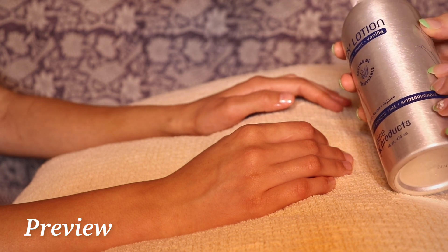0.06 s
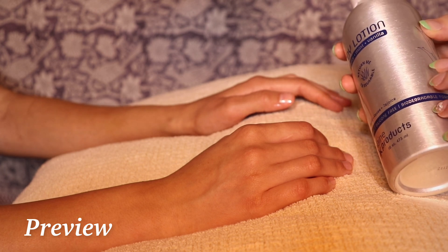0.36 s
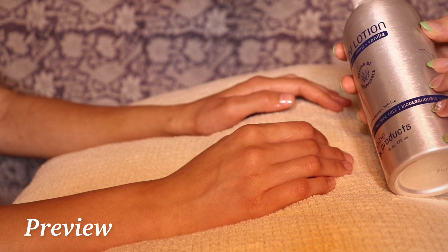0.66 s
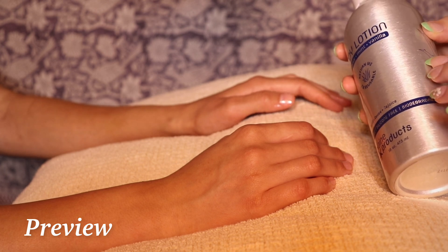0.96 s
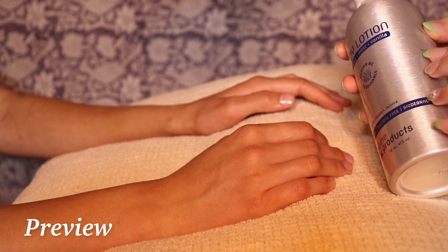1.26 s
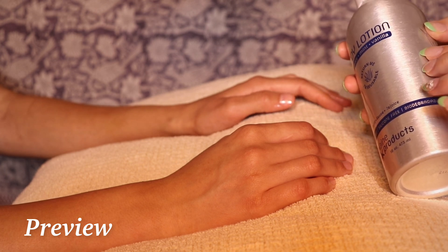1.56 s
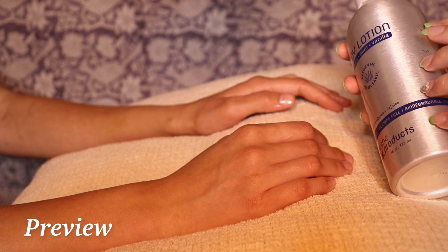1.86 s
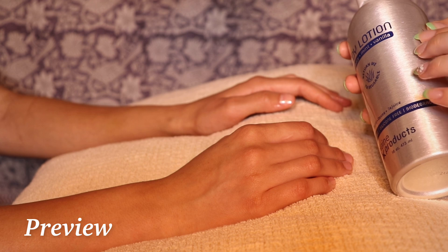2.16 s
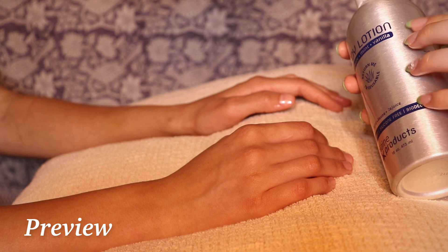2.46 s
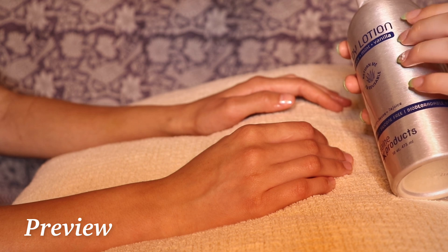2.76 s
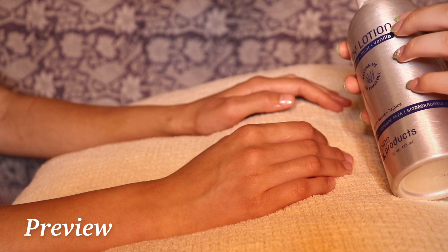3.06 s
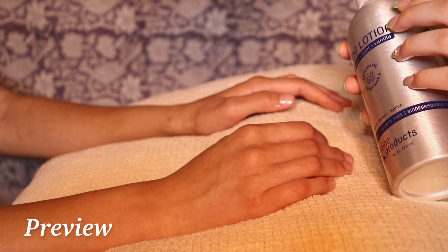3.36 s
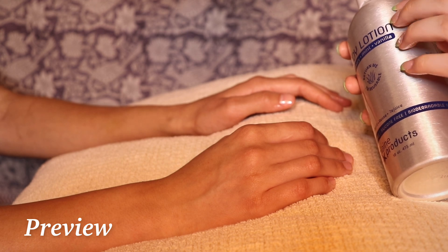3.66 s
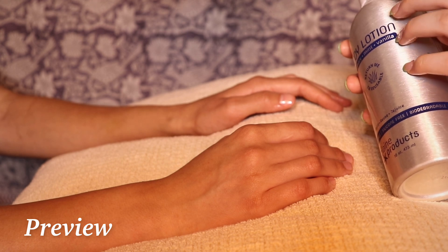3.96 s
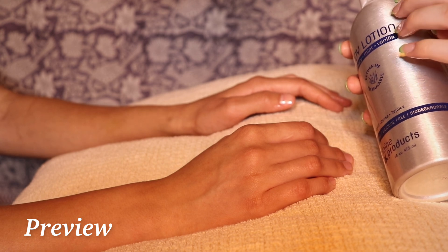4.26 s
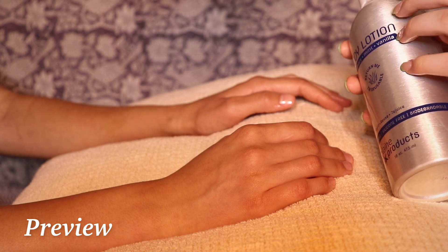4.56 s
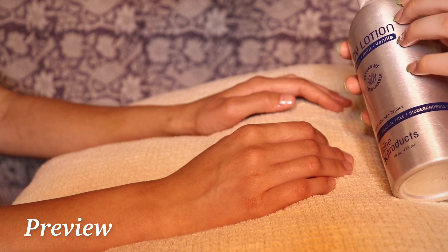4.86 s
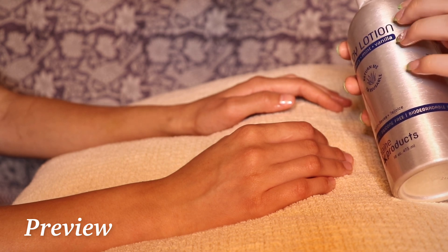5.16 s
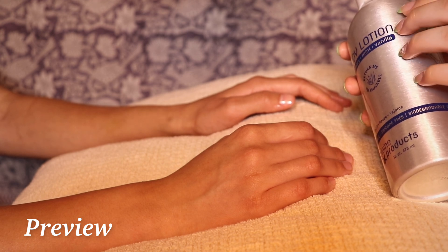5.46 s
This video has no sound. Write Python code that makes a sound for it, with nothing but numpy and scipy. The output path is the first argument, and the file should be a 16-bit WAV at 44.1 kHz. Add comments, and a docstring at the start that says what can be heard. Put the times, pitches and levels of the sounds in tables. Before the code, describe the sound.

In a small, quiet room, fingernails click on a metal bottle in a quick, irregular pattern, about six or seven taps a second. The taps are close and crisp, their ring cut short by the holding hand, and they move slightly between left and right. A soft towel rustle and a few dull presses on a padded table lie far below them, along with faint room hum and microphone hiss.

```python
"""Sharp clicks come first: long fingernails tap a hand-held metal lotion bottle near a stereo microphone. Each
nail makes the metal wall ring briefly, the hand damps it, and a small, soft room answers. Underneath, hands
shift on a towel, which rustles while the padded table gives a muffled rumble. A faint hum, partly the table's
low resonance, and a microphone hiss run all the way through."""
import sys
import numpy as np
from scipy import signal
from scipy.fft import rfft, irfft, next_fast_len
from scipy.io import wavfile
from scipy.ndimage import uniform_filter1d, map_coordinates

SR = 44100
rng = np.random.default_rng(int(sys.argv[2]) if len(sys.argv) > 2 else 0)


def inscribe(sig):
    """Save sig as 16-bit PCM at rate SR to the path in sys.argv[1].

    A 1-D sig is mono; a 2-D sig holds one channel per row.
    Samples are clipped to [-1, 1] before scaling.
    """
    pcm = np.round(np.clip(np.atleast_2d(sig).T, -1, 1) * 32767)
    wavfile.write(sys.argv[1], SR, pcm.astype(np.int16))


N = 242991

# the steady faint tones: (frequency [Hz], level [dB]); the lowest, near 103 Hz, is the padded table's
# resonance, the rest the room's hum
HUM_TONES = [(102.5, -82), (360.7, -84), (473, -97.5), (527, -99), (829, -101)]
# the tone colour of each noise: (frequency [Hz], relative level [dB])
HISS_COLOUR = [(100, -2), (1500, -1), (2800, -1.5), (6500, 1), (10000, 0), (15600, -.5), (16300, -25)]  # microphone
RUMBLE_COLOUR = [(12, -40), (24, -19.5), (32, -5.5), (40, 4.5), (50, -9.5), (62, -15), (100, -34),
                 (400, -100)]  # the table's deepest sound
THUD_COLOUR = [(40, -28), (60, 1.5), (80, -4), (92, -7), (103, 1.5), (128, -9.5), (190, -18), (300, -44.5),
               (700, -87.5)]  # the table, a little higher
CLOTH_COLOUR = [(60, -14.5), (170, 5.5), (330, 1.5), (430, -6.5), (700, -14), (1100, -23), (2000, -29),
                (6000, -36.5)]  # towel
WEAK_TONES_COLOUR = [(300, -28.5), (1000, -20.5), (1900, -19.5), (3000, -10), (6000, -4), (9000, 1),
                     (11000, 6.5), (16000, -8)]  # the bottle's many weak, crowded tones
ROOM_COLOUR = [(500, -3), (3000, 0.5), (7000, -2.5), (10000, -2), (13000, -4.5), (15600, -5), (16400, -19)]  # the room's answer
# how much the hands move on the towel: (time [s], relative level [dB])
HAND_MOTION = [(0, -0.5), (1.3, 0.5), (1.45, -3.5), (3.6, -3), (4.2, 2), (5.2, 0), (5.51, -2)]
# a hand presses into the padded table: (time [s], half length [s], rumble [dB], thud [dB])
HAND_PRESSES = [(0.624, 0.073, -54.5, -59), (0.819, .055, -46.5, -49.5), (0.917, .04, -71.5, -50),
                (1.865, 0.055, -56, -63), (4.59, 0.21, -53.5, -73)]
# soft brushes of cloth: (time [s], level [dB], strongest frequency [Hz], half length [s])
CLOTH_BRUSHES = [(2.929, -64.5, 480, 0.01), (3.046, -71, 600, 0.0045)]
# how long the room rings: (frequency [Hz], time to fade by 60 dB [s])
ROOM_FADE = [(500, 0.28), (2500, 0.18), (5000, 0.23), (9000, 0.21), (15000, 0.23)]
# first echoes from nearby surfaces: (delay [s], level against the click [dB])
NEAR_ECHOES = [(.0059, -30), (0.0134, -29)]
# the shell's hollow knock drifts with the grip: (time [s], upper tone [Hz], lower tone against it [dB])
KNOCK_TONES = [(0.498, 2500, -27), (1.196, 2320, -16), (1.701, 2333, -5.5), (2, 2264, -22),
               (2.948, 2223, -30), (5.102, 2270, -19)]
# the main tones of the bottle wall: (frequency [Hz], relative level [dB], base time to fade by 60 dB [s])
WALL_TONES = [(3050.0, -12, 0.02), (3750.0, -7, 0.009), (4280.0, -6, 0.013), (4830.0, -7, 0.005),
              (5810.0, 0, 0.005), (6280.0, -1, 0.008), (6870.0, 5, 0.005), (7640.0, 4, 0.006),
              (8240.0, 3, 0.005), (9260.0, -3, 0.009), (9820.0, -6, 0.006), (12030.0, -1, 0.007),
              (12770.0, 1, 0.005), (14010.0, -7, 0.005), (15100.0, -4, 0.005)]
# the dull tick of the finger behind the nail: (frequency [Hz], relative level [dB])
FINGER_COLOUR = [(150, -11), (700, -3.5), (1500, 10.0), (2500, -6.5), (8000, -9)]
# nails that only graze the bottle: (time [s], relative level [dB])
NAIL_GRAZES = [(.339, -44), (0.973, -54), (2.105, -61)]
# nail taps: (time [s], level [dB], wall pitch [ratio], spot along the wall [0-1], spot around it [0-1],
# low edge of the click [Hz], brightness [dB], knock against the click [dB], left minus right [dB])
NAIL_TAPS = [(0.122, -28.1, 1.02, 0.13, 0.45, 4400.0, 4.0, -47.0, -5.0),
             (0.2838, -24.3, 1.01, 0.34, 0.2, 3200.0, -0.0, -41.0, -2.0),
             (0.292, -26.9, 0.99, 0.1, 0.05, 2900.0, 7.0, -41.0, -4.0),
             (0.3431, -38.9, 1.07, 0.08, 0.4, 2900.0, 8.0, -43.0, -3.0),
             (0.5123, -22.8, 0.93, 0.09, 0.05, 2600.0, 15.0, -28.0, 0.0),
             (0.7467, -32.1, 0.98, 0.16, 0.1, 3900.0, -9.0, -44.0, -4.0),
             (0.8511, -23.2, 1.02, 0.05, 0.0, 2900.0, -1.0, -50.0, 0.0),
             (0.9913, -36.8, 1.01, 0.12, 0.5, 2900.0, -15.0, -17.0, -5.0),
             (1.2237, -31.5, 0.93, 0.17, 0.0, 3500.0, -1.0, -44.0, -5.0),
             (1.431, -22.6, 0.99, 0.18, 0.35, 4400.0, -4.0, -52.0, 0.0),
             (1.5916, -30.7, 1.02, 0.34, 0.2, 2900.0, 12.0, -51.0, 2.0),
             (1.6769, -27.0, 0.93, 0.16, 0.35, 3900.0, -6.0, -29.0, 1.0),
             (1.9327, -37.0, 0.97, 0.16, 0.1, 3200.0, -16.0, -39.0, -3.0),
             (1.9768, -22.9, 1.05, 0.09, 0.35, 3200.0, 12.0, -32.0, 2.0),
             (2.1923, -31.0, 0.96, 0.11, 0.2, 2900.0, -1.0, -46.0, 3.0),
             (2.4703, -35.1, 0.96, 0.21, 0.45, 3200.0, 2.0, -47.0, 1.0),
             (2.5826, -36.2, 0.98, 0.43, 0.15, 3200.0, 20.0, -43.0, 3.0),
             (2.6711, -23.0, 0.99, 0.26, 0.2, 2900.0, 6.0, -52.0, 2.0),
             (2.889, -34.9, 0.97, 0.18, 0.45, 3200.0, -3.0, -31.0, 1.0),
             (2.9572, -23.0, 0.98, 0.19, 0.35, 4400.0, 9.0, -31.0, 3.0),
             (3.1792, -29.7, 1.0, 0.02, 0.3, 3200.0, 3.0, -53.0, 4.0),
             (3.4062, -23.5, 0.99, 0.1, 0.0, 2600.0, 7.0, -37.0, 2.0),
             (3.4355, -23.5, 0.99, 0.09, 0.0, 2600.0, 20.0, -31.0, 3.0),
             (3.7478, -34.6, 0.95, 0.4, 0.3, 4400.0, 0.0, -54.0, 5.0),
             (4.005, -33.4, 1.06, 0.27, 0.05, 3200.0, -12.0, -52.0, -1.0),
             (4.1285, -24.9, 0.97, 0.1, 0.3, 2900.0, 1.0, -48.0, -1.0),
             (4.1729, -26.7, 0.99, 0.1, 0.05, 2900.0, 18.0, -48.0, 1.0),
             (4.3006, -30.4, 1.0, 0.12, 0.4, 4400.0, 0.0, -55.0, 0.0),
             (4.4218, -35.2, 1.04, 0.2, 0.4, 2600.0, -3.0, -41.0, -4.0),
             (4.4888, -24.4, 0.97, 0.1, 0.3, 2900.0, 9.0, -52.0, -1.0),
             (4.5437, -23.4, 1.0, 0.45, 0.5, 5000.0, 10.0, -42.0, 0.0),
             (4.7181, -30.6, 1.01, 0.34, 0.4, 4400.0, -4.0, -52.0, 1.0),
             (4.9386, -30.8, 1.07, 0.3, 0.35, 2900.0, -19.0, -41.0, -4.0),
             (5.0766, -40.9, 0.98, 0.42, 0.5, 3200.0, -14.0, -28.0, -8.0),
             (5.1034, -23.3, 0.95, 0.18, 0.3, 5000.0, 5.0, -37.0, 0.0),
             (5.2888, -23.1, 0.97, 0.39, 0.25, 2900.0, 11.0, -55.0, 3.0),
             (5.5059, -24.6, 0.97, 0.11, 0.3, 2900.0, 4.0, -43.0, 2.0)]

HISS_DB, TOP_HZ = -75.6, 16700
RUMBLE_DB, THUD_DB, CLOTH_DB = -59.5, -64.5, -70.5  # when the hand motion is at 0 dB
FIRM_TAP_DB = -23  # lighter taps are counted down from this level


def amp(db):
    """Turn decibels into a number to multiply a sound by."""
    return 10 ** (np.asarray(db) / 20)


def unit(x):
    """Scale a sound so that its average level (rms) is 1."""
    return x / np.sqrt(np.mean(x ** 2) + 1e-20)


def along(points, hz):
    """Read between (frequency, value) points on a logarithmic frequency scale."""
    frequencies, values = np.transpose(points)
    return np.interp(np.log(hz + 1), np.log(frequencies + 1), values)


def filtered(x, gain):
    """Turn each frequency of a sound up or down by gain(frequency)."""
    size = x.shape[-1]
    padded = next_fast_len(size + SR // 10)
    return irfft(rfft(x, padded) * gain(np.fft.rfftfreq(padded, 1 / SR)), padded)[..., :size]


def causal(gain):
    """Make a filter with this gain that lets nothing sound before the blow (minimum phase)."""
    cepstrum = irfft(np.log(np.maximum(gain, 1e-6)))
    half = cepstrum.shape[-1] // 2
    cepstrum[..., 1:half] *= 2
    cepstrum[..., half + 1:] = 0
    return np.exp(rfft(cepstrum))


def sides(pan_db):
    """Left and right gains that make the left side pan_db louder than the right."""
    pair = amp(np.array([[.5], [-.5]]) * pan_db)
    return pair / np.sqrt(np.mean(pair ** 2, axis=0))


def noise(colour, side_db, size=N):
    """Stereo noise of level 1 with this tone colour; a higher side_db makes it wider."""
    mid, side = filtered(rng.standard_normal((2, size)), lambda hz: amp(along(colour, hz)))
    return unit(np.array([mid + amp(side_db) * side, mid - amp(side_db) * side]))


def wobble(per_second):
    """A smooth curve through this many random values a second."""
    return map_coordinates(rng.standard_normal(256), [np.arange(N) * per_second / SR], mode="wrap")


def add(track, time, sound):
    """Mix a sound into the track, starting at a time in seconds."""
    part = track[:, max(round(time * SR), 0):][:, :sound.shape[1]]
    part += sound[:, :part.shape[1]]


def hum_and_hiss():
    """A few faint, wavering tones hum (the lowest from the padded table, the rest from the room), and the
    microphone hisses."""
    t = np.arange(N) / SR
    drift_times = np.linspace(0, N / SR, num=20)
    hum = np.zeros(N)
    for hz, db in HUM_TONES:
        drift = np.interp(t, drift_times, 1.9 * rng.standard_normal(len(drift_times)))
        hum += amp(db) * np.sqrt(2) * np.sin(2 * np.pi * hz * t + drift)
    return hum + amp(HISS_DB) * noise(HISS_COLOUR, side_db=-2)


def hands_on_towel():
    """Hands press and slide unevenly: the padded table rumbles and thuds under a soft, wide rustle."""
    t = np.arange(N) / SR
    motion_db = np.interp(t, *np.transpose(HAND_MOTION)) + 1.46 * wobble(per_second=9)
    rumble = amp(RUMBLE_DB + 1.4 * motion_db)
    thud = amp(THUD_DB + motion_db)
    for time, half_length, rumble_db, thud_db in HAND_PRESSES:
        swell = np.exp(-((t - time) / half_length) ** 2)
        rumble = np.hypot(rumble, amp(rumble_db) * swell)
        thud = np.hypot(thud, amp(thud_db) * swell)
    table = rumble * noise(RUMBLE_COLOUR, side_db=-18) + thud * noise(THUD_COLOUR, side_db=-17)
    cloth = amp(CLOTH_DB + motion_db) * noise(CLOTH_COLOUR, side_db=-2)
    for time, db, hz, half_length in CLOTH_BRUSHES:
        swell = np.exp(-((t - time) / half_length) ** 2)
        colour = [(hz / 3, -25), (hz, 0), (hz * 2, -16), (hz * 10, -50)]
        cloth += amp(db) * swell * noise(colour, side_db=7)
    return table * sides(2.5) + cloth


def room_tail():
    """The room's many echoes blur into a fading noise, new on every call."""
    hz, t, spectrum = signal.stft(rng.standard_normal((2, SR // 3)), SR, nperseg=128)
    fade = amp(along(ROOM_COLOUR, hz)[:, None] - 60 * t / along(ROOM_FADE, hz)[:, None])
    tail = signal.istft(spectrum * fade, SR, nperseg=128)[1]
    tail *= np.clip(np.arange(tail.shape[1]) / SR / .003, 0, 1)  # builds up over 3 ms
    return tail / np.linalg.norm(tail[0])


def shell_knock(time, size=2048):
    """The bottle's whole shell rings with two low tones: a hollow knock."""
    t = np.arange(size) / SR
    times, upper_hz, lower_db = np.transpose(KNOCK_TONES)
    phase = 2 * np.pi * np.interp(time, times, upper_hz) * t
    lower_tone = amp(np.interp(time, times, lower_db)) * np.sin(.73 * phase)
    ring = (np.sin(phase) + lower_tone) * amp(-60 * t / .029)
    rise = 1 - np.exp(-t / .0007)
    return sides(-4) * unit(ring * rise) / np.sqrt(size)


def wall_ring(t, pitch, along_wall, around_wall, ring_db):
    """The spot under the nail decides which tones sound; a looser grip (higher ring_db) lengthens them."""
    hz, db, base_fade = np.transpose(WALL_TONES)[:, :, None]
    lengthwise = np.arange(1, len(WALL_TONES) + 1)[:, None]  # each tone bends the wall in its own pattern
    around = lengthwise % 4 + 1
    drive = .1 + (np.sin(np.pi * along_wall * lengthwise) * np.cos(np.pi * around_wall * around)) ** 2
    # each tone reaches each side with its own level and delay
    scatter, lag = rng.standard_normal((2, 2, len(WALL_TONES), 1))
    phase = 2 * np.pi * pitch * hz * t + .42 * lag
    fade_time = base_fade * amp(.2 * np.clip(ring_db, -12, 6) + 2.3)
    main_tones = np.sum(drive * amp(db + 1.3 * scatter - 60 * t / fade_time) * np.cos(phase), axis=1)
    rise = 1 - .45 * np.exp(-t / .00014)  # the nail's tip flexes as it lands
    weak_tones = noise(WEAK_TONES_COLOUR, side_db=-3, size=len(t)) * amp(-60 * t / .008)
    return unit(main_tones * rise) + amp(-15 + .4 * ring_db) * unit(weak_tones)


def nail_click(pitch, along_wall, around_wall, edge_hz, bright_db, pan_db, lighter_db, size=2048):
    """One nail hits the wall: gives the click at the microphone and the sound sent into the room."""
    t, hz = np.arange(size) / SR, np.fft.rfftfreq(size, 1 / SR)
    ring_db = -8.5 + .074 * lighter_db  # a lighter finger damps the wall less
    ring = wall_ring(t, pitch, along_wall, around_wall, ring_db)
    # a nail tip is bright; a flatter nail is duller
    contact = amp(along([(4000, .8), (6500, 0), (9500, bright_db), (15200, bright_db),
                         (16800, bright_db - 9)], hz))
    low_cut = 1 / np.sqrt(1 + (edge_hz / (hz + 1)) ** 30) + amp(-44)
    treble_pan_db = pan_db - .83 * lighter_db  # the treble of lighter taps leans to the right
    pan = sides(along([(6500, pan_db), (11000, treble_pan_db)], hz))
    spectrum = rfft(ring) * causal(contact * low_cut * pan)
    finger = amp(-50.5) * unit(irfft(causal(amp(along(FINGER_COLOUR, hz)))))
    click = unit(irfft(spectrum)) + finger
    # the room hears the wall from all sides, so peaks and dips even out
    power = np.abs(uniform_filter1d(np.mean(np.abs(spectrum) ** 2, axis=0), size=90))
    evened = np.sqrt(power + amp(-16) ** 2 * power.max())
    into_room = unit(irfft(causal(evened * low_cut * sides(pan_db * .3))))
    return click / np.sqrt(size), into_room / np.sqrt(size)


def nails_on_bottle():
    """Each tap clicks, knocks and echoes round the room; a graze is just a tiny burst of noise."""
    track = np.zeros((2, N))
    for time, db, pitch, along_wall, around_wall, edge_hz, bright_db, knock_db, pan_db in NAIL_TAPS:
        strength = amp(db) * np.sqrt(SR / 200)  # the energy of 5 ms at this level
        lighter_db = FIRM_TAP_DB - db
        click, into_room = nail_click(pitch, along_wall, around_wall, edge_hz, bright_db, pan_db,
                                      lighter_db)
        knock = amp(knock_db) * shell_knock(time)
        add(track, time, strength * (click + knock))
        for delay, echo_db in NEAR_ECHOES:
            for side in np.eye(2)[:, :, None]:  # each side gets the echo at its own moment
                arrival = time + delay + .00041 * rng.standard_normal()
                add(track, arrival, strength * amp(echo_db) * side * click)
        room = signal.fftconvolve(into_room + knock, room_tail(), axes=1)
        room_db = -15.5 + .35 * lighter_db  # lighter taps have a larger share of room sound
        add(track, time, strength * amp(room_db) * room)
    t = np.arange(SR // 20) / SR
    for time, db in NAIL_GRAZES:
        graze = noise(WEAK_TONES_COLOUR, side_db=-6, size=len(t)) * amp(-60 * t / .016)
        add(track, time, amp(db - 3) * graze)
    return track


def scene():
    """Mix the taps with the towel and the quiet background."""
    return nails_on_bottle() + hands_on_towel() + hum_and_hiss()


def record(dry):
    """The recorder cuts the treble off steeply above TOP_HZ."""
    return filtered(dry, lambda hz: 1 / np.sqrt(1 + (hz / TOP_HZ) ** 160))


dry = scene()
out = record(dry)
inscribe(out)
```